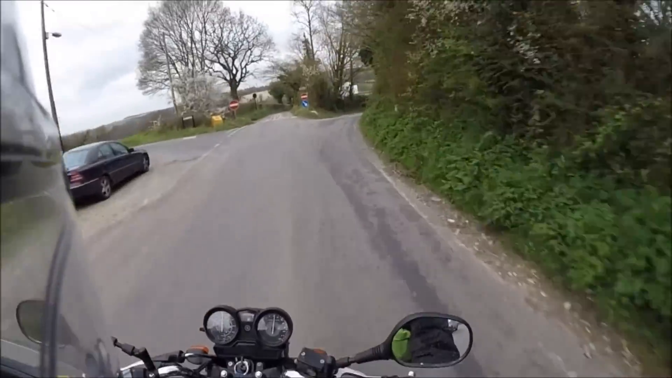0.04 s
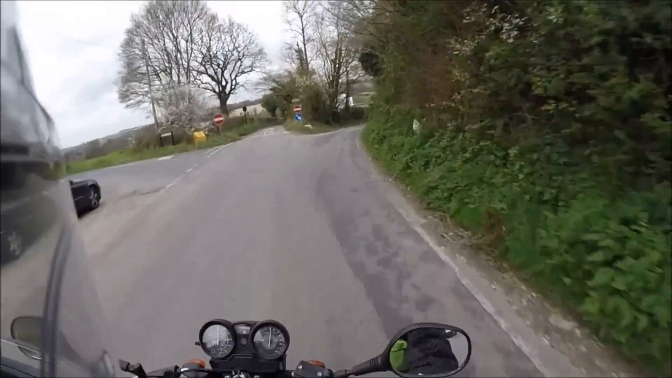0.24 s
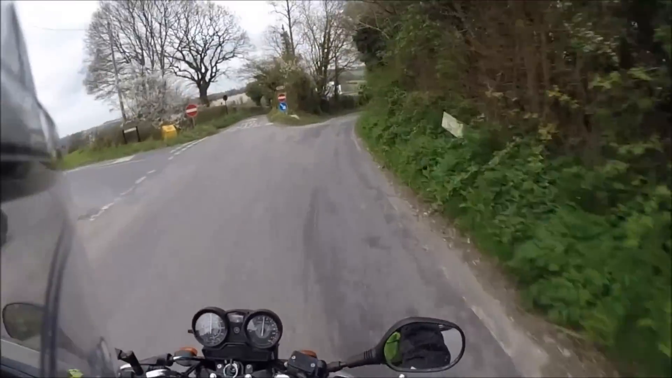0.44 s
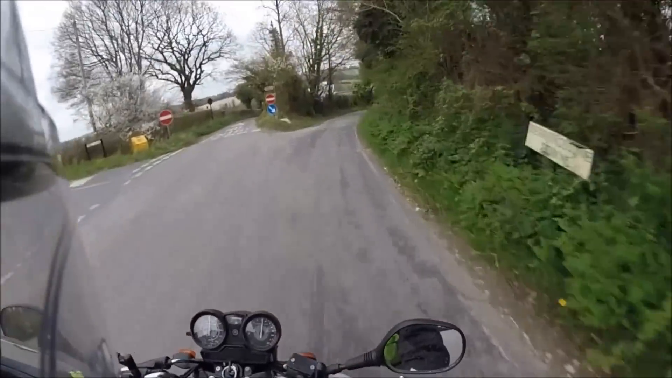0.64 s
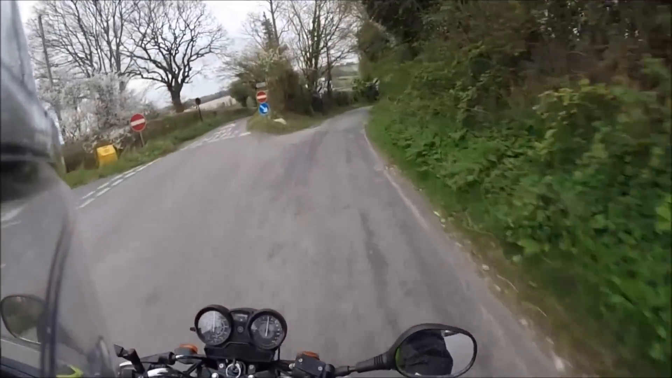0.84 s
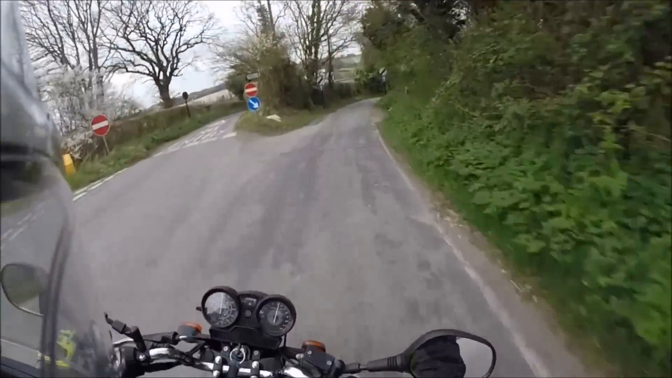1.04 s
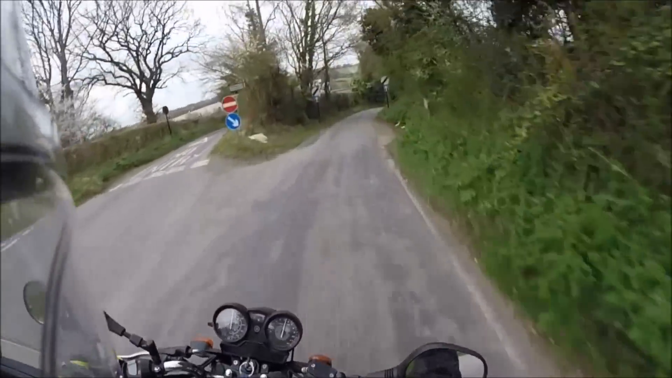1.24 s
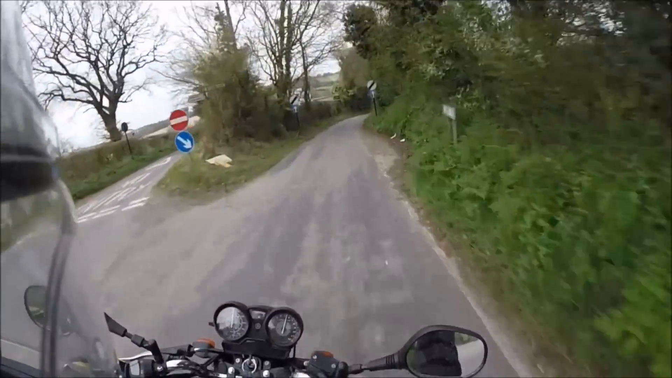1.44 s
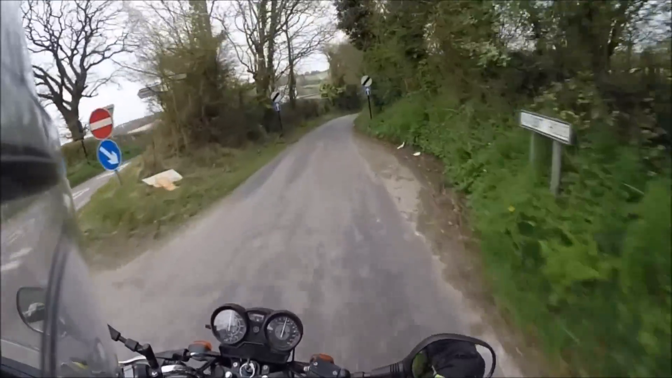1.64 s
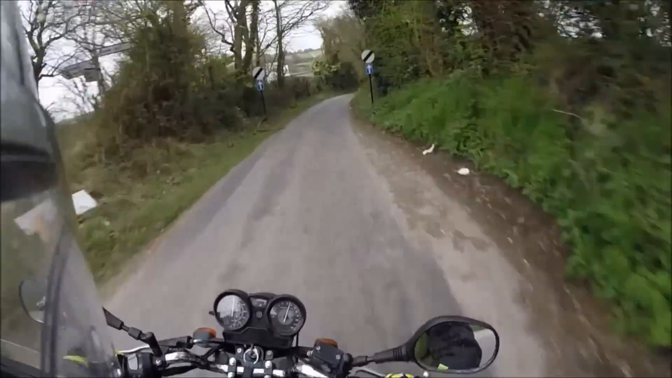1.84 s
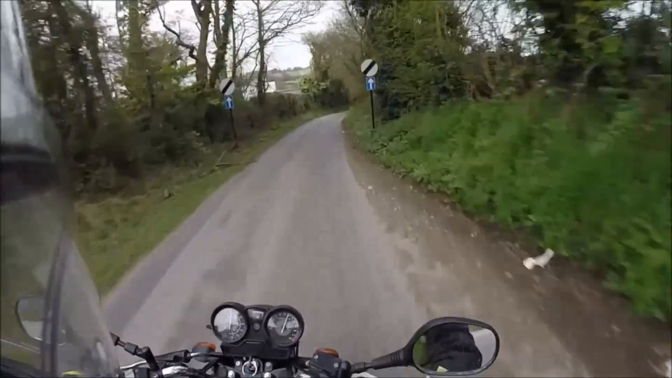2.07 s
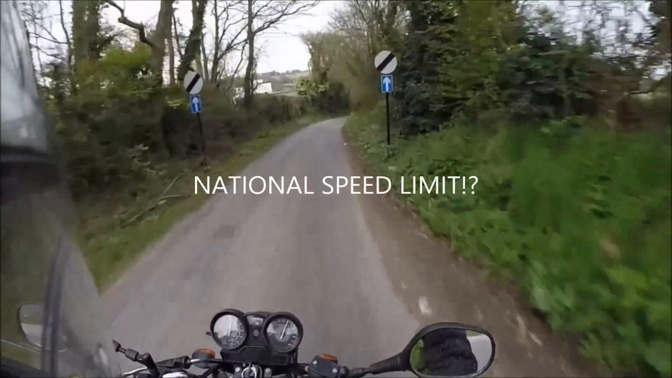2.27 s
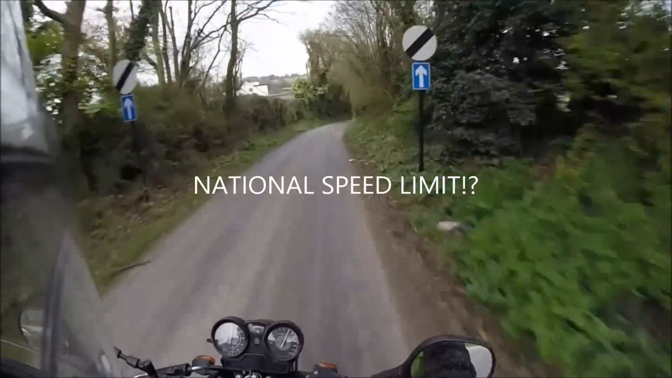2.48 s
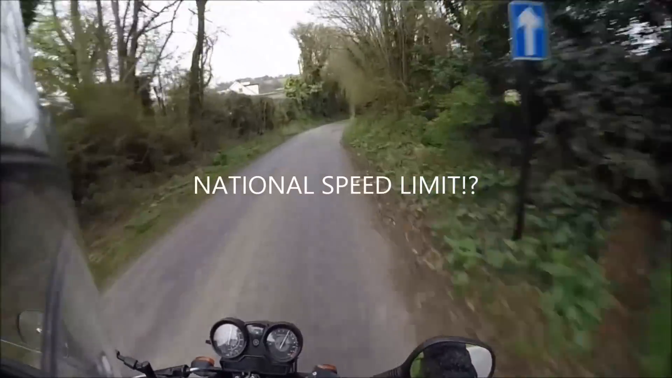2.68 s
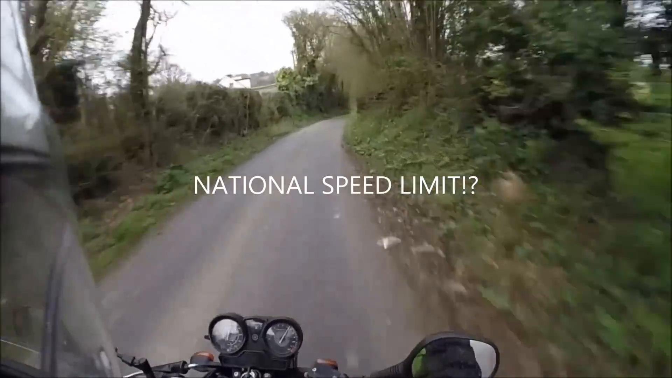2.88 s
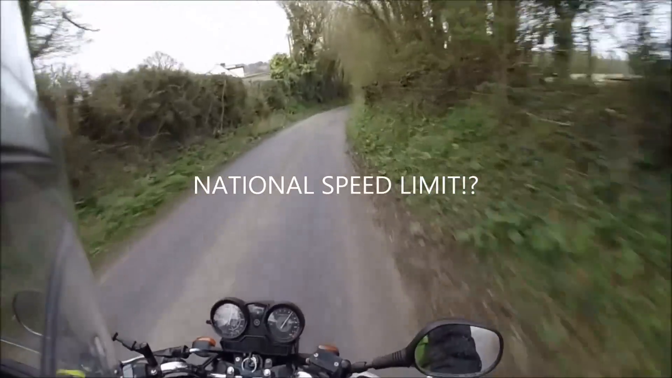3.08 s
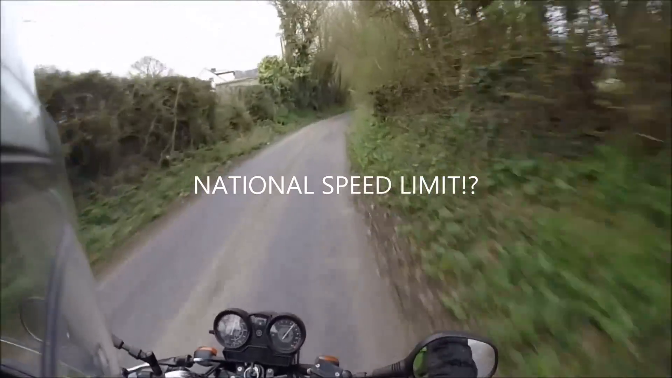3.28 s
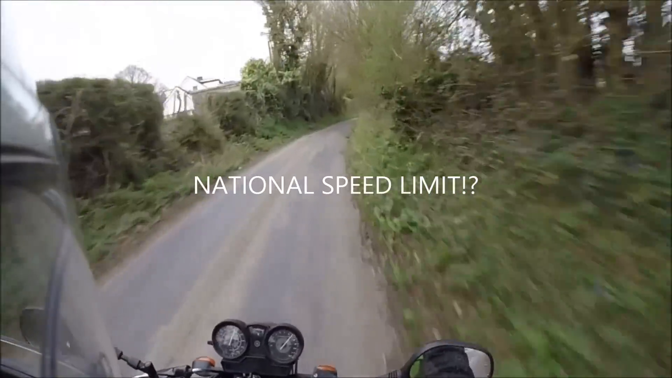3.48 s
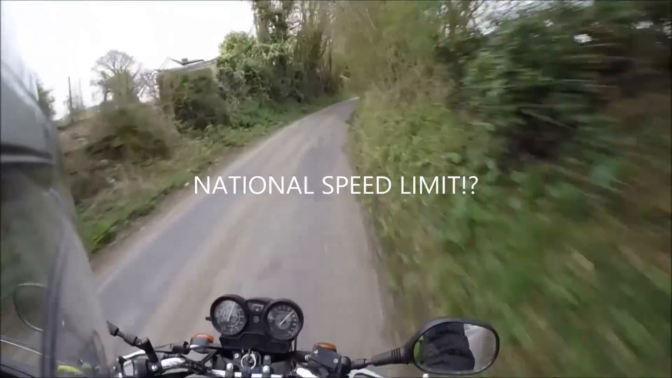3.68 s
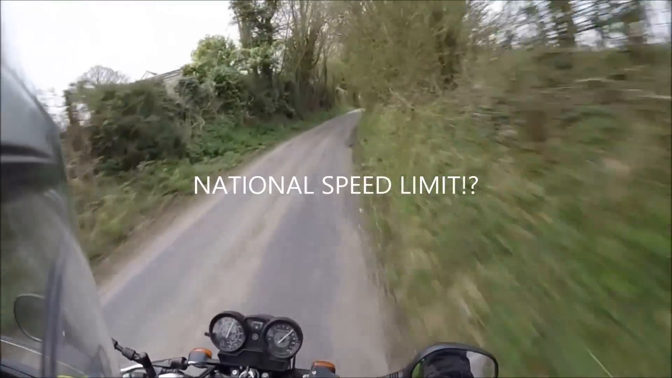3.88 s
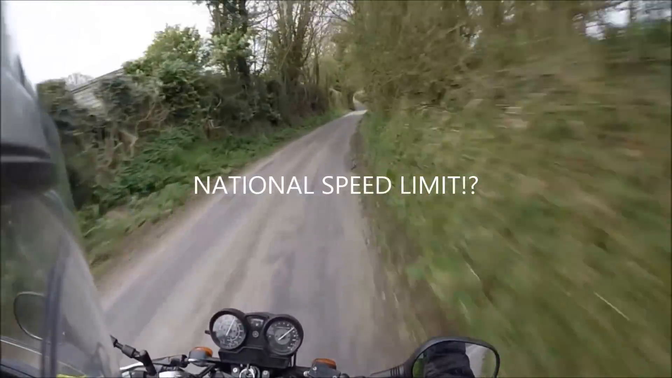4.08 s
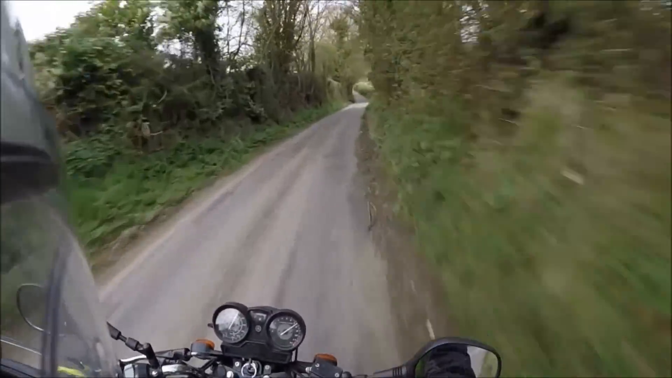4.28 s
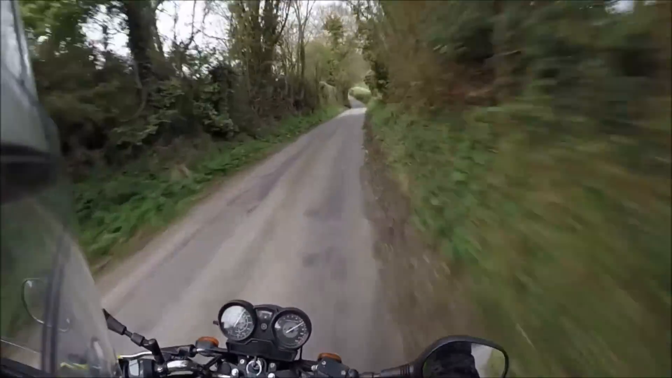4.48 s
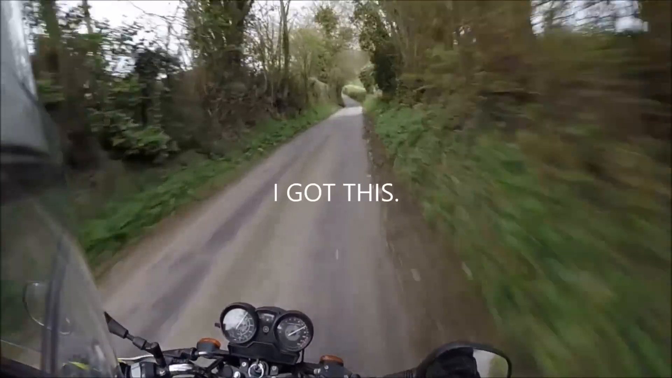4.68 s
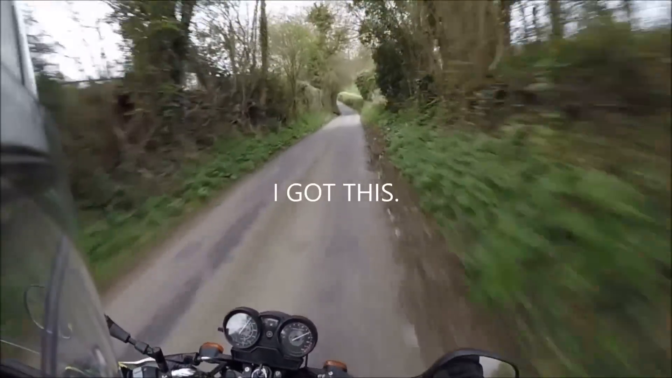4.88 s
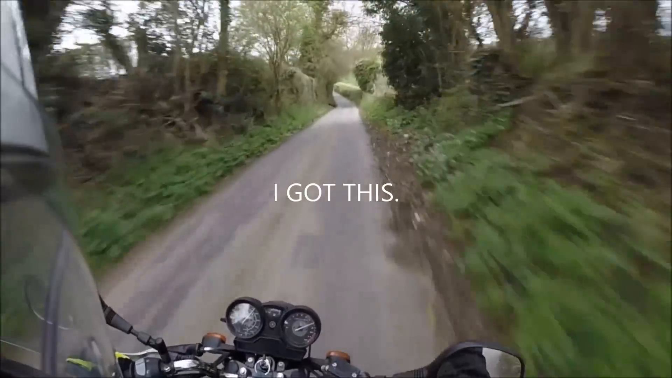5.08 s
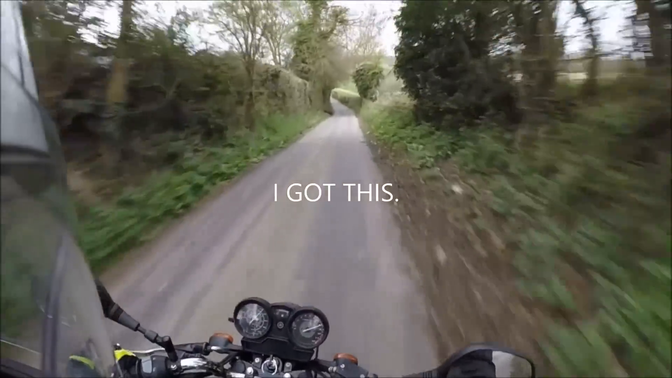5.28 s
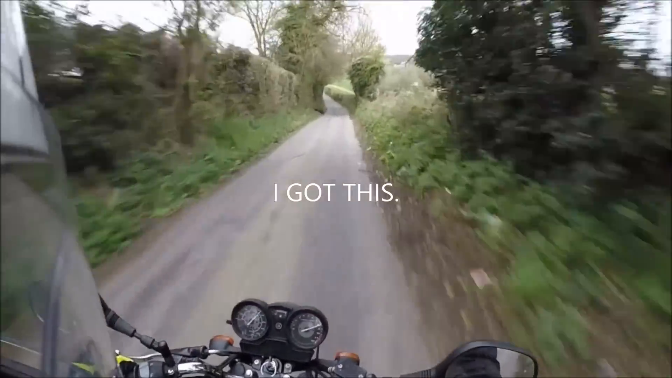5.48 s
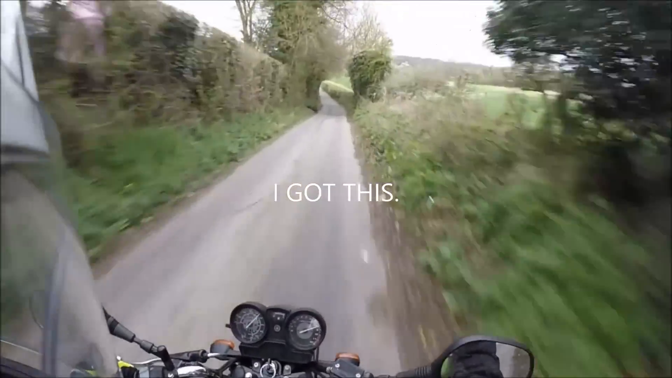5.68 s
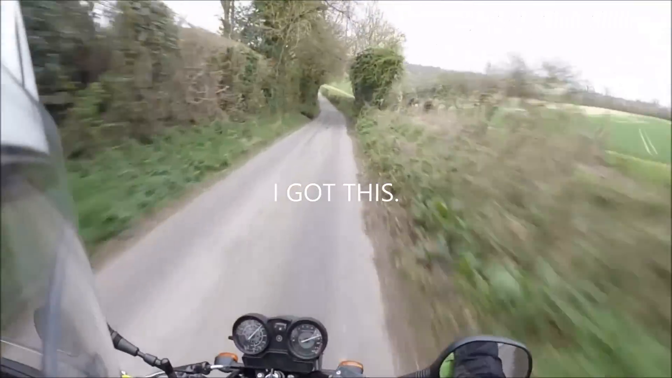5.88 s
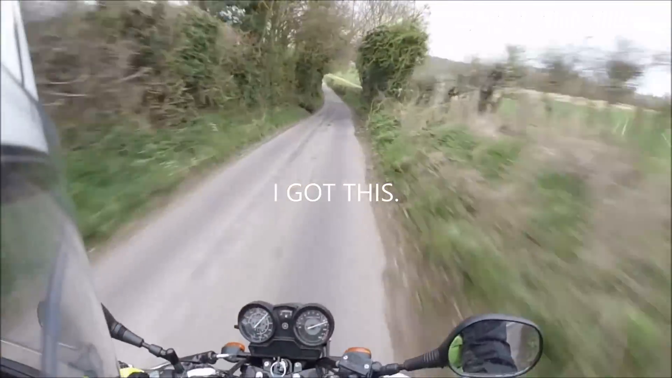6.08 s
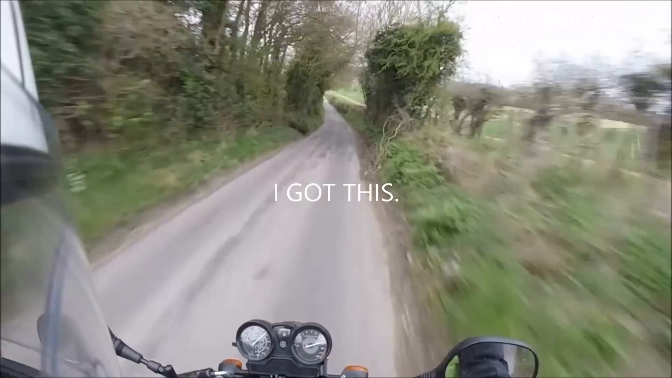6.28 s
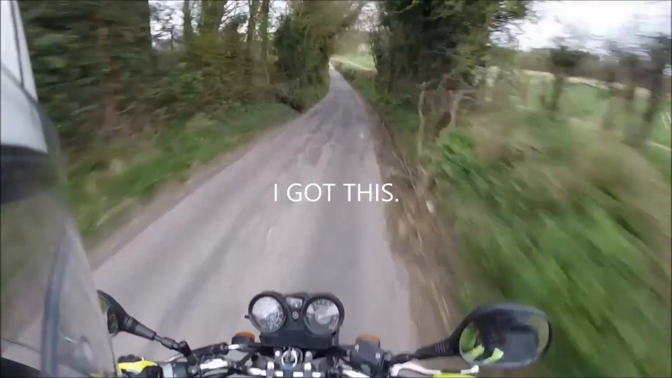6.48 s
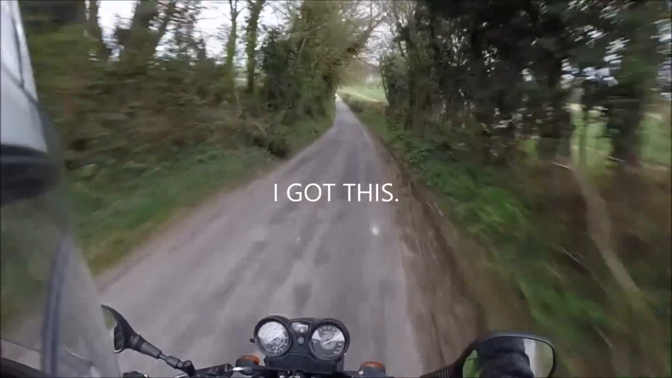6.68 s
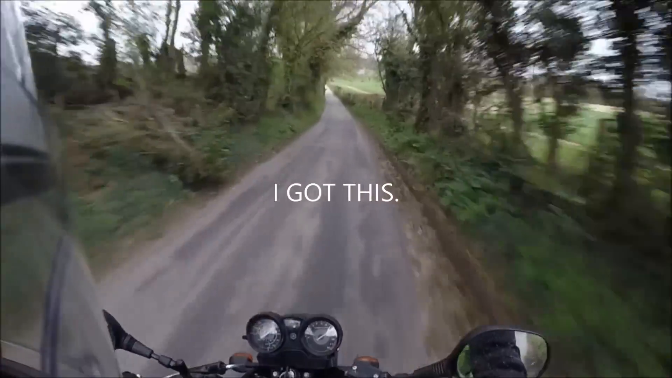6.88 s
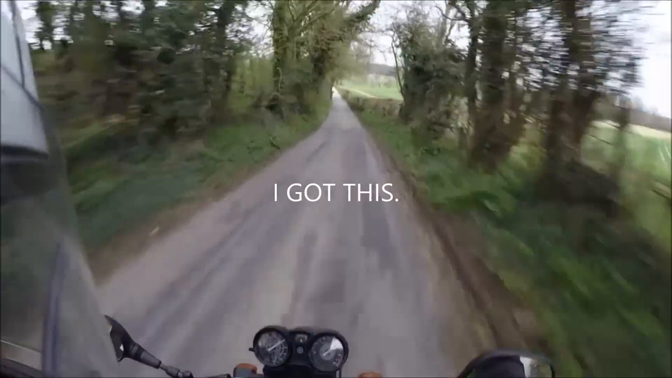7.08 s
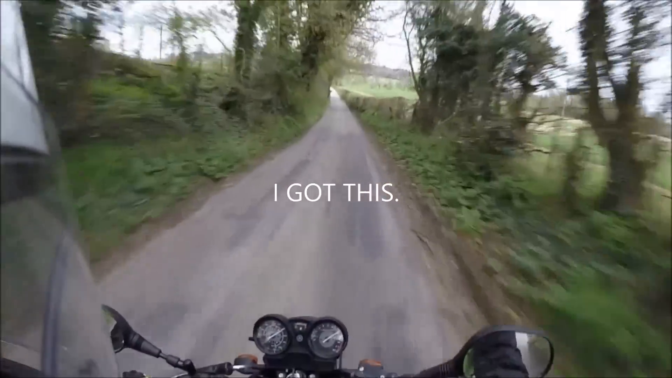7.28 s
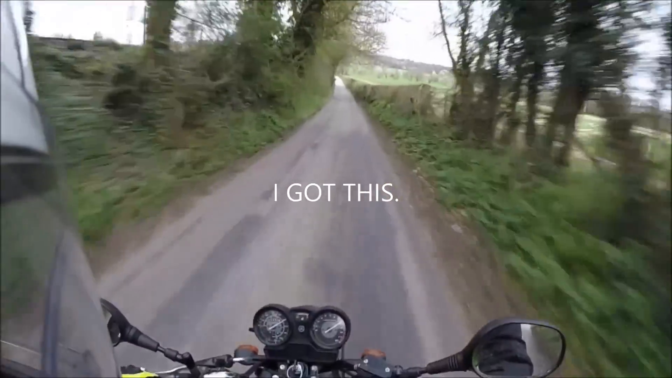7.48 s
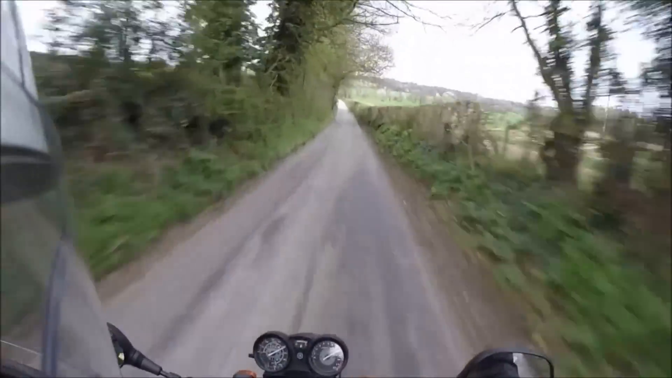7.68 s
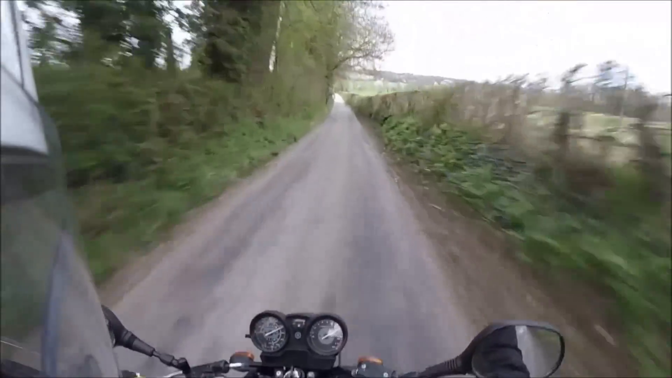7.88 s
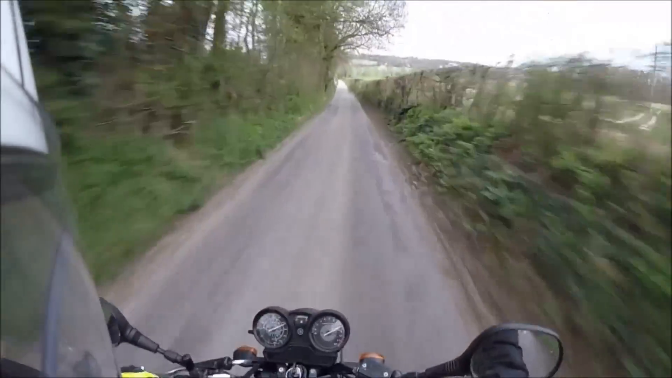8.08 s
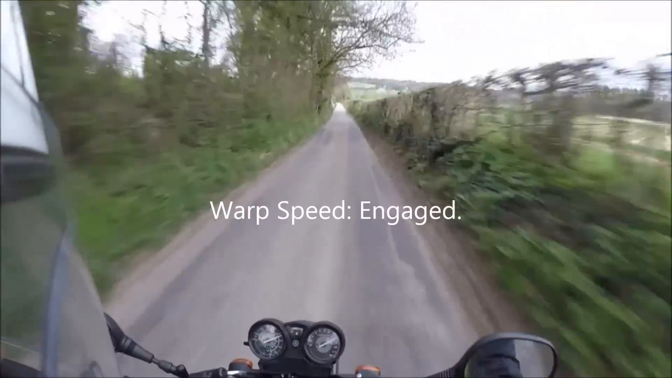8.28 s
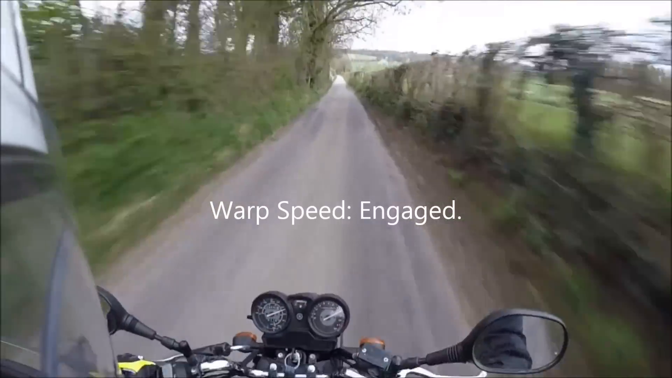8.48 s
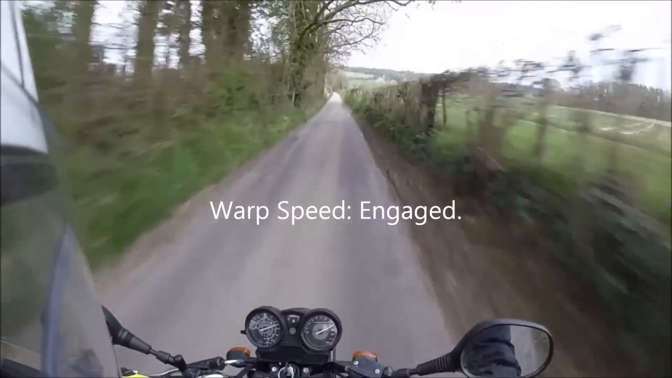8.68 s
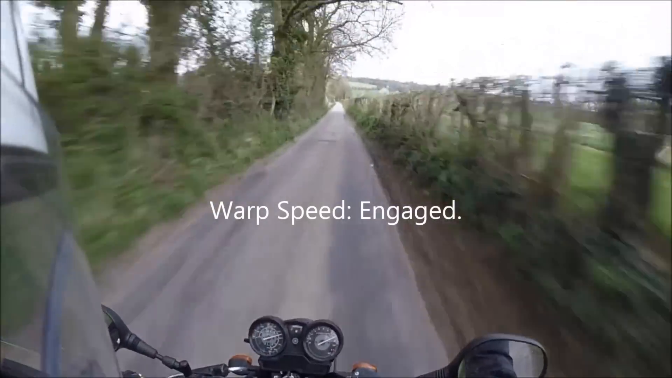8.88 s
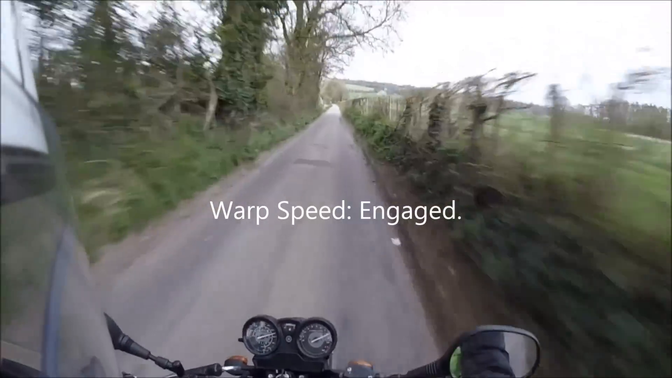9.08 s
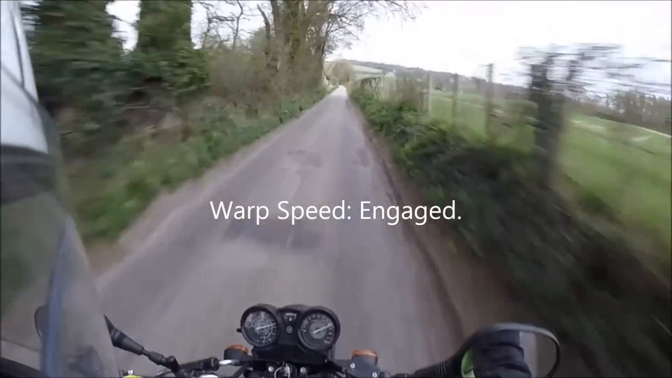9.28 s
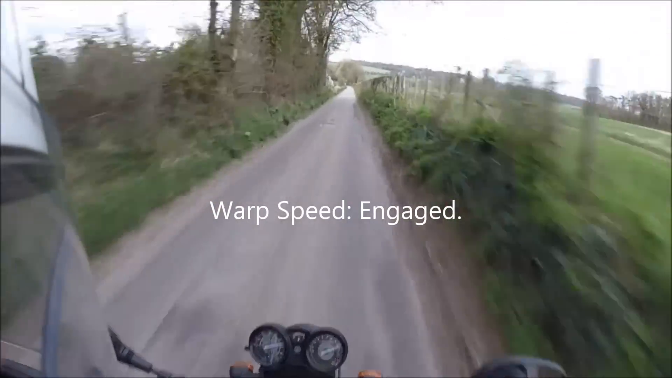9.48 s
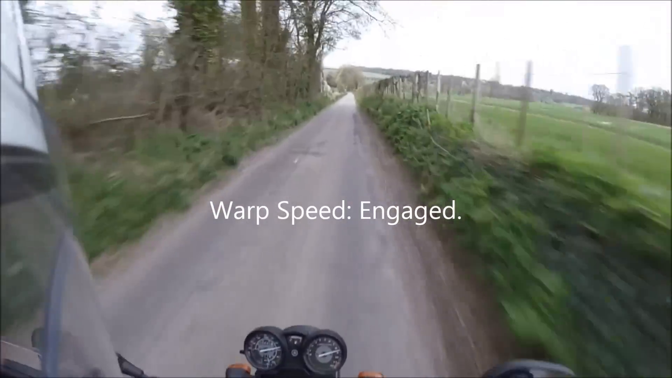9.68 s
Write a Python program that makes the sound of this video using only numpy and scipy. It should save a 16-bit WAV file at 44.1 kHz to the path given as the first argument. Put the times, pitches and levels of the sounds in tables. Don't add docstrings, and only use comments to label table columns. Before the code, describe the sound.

Wind fades in and rushes over an enclosed microphone on an accelerating motorcycle, brightening with speed, while a faint single-cylinder engine climbs underneath.

```python
import sys
import numpy as np
from scipy import signal
from scipy.fft import rfft, irfft, next_fast_len
from scipy.io import wavfile
from scipy.ndimage import uniform_filter1d

SR = 44100
rng = np.random.default_rng(int(sys.argv[2]) if len(sys.argv) > 2 else 0)


def level_to_linear(level):
    exponent = np.asarray(level, float) / 20
    return 10 ** exponent


def store_pcm(level_fs):
    pcm = np.round(np.clip(level_fs, -1, 1) * 32767).astype(np.int16)
    wavfile.write(sys.argv[1], SR, np.atleast_2d(pcm).T)


N = 429534

# time in seconds, rush in dB.
RUSH = [(0.0, -40.5), (0.05, -42.5), (0.43, -31.5), (0.84, -29.5), (1.0, -24.5), (1.16, -27.5),
        (1.54, -23.5), (1.98, -24), (2.3, -20.5), (5.07, -20.5), (5.24, -21.5), (6.78, -20.5),
        (7.24, -21.5), (7.35, -19.5), (8.24, -21), (8.71, -19), (9.0, -20.5), (9.74, -20.5)]
# frequency in Hz, density in dB per Hz.
HOUSING_COLOUR = [(30, -8), (250, -15.5), (420, -20), (800, -21), (1250, -16), (1500, -3), (2100, -4.5),
                  (3550, -7.5), (3950, -18), (4120, -25.5), (7300, -31.5), (8200, -41), (14000, -51),
                  (15500, -59)]
# centre in Hz, width in Hz, height in dB.
CAVITIES = [(75.4, 38, -1.5), (176, 86, 8.5), (331, 82, 6.5), (610, 58, 3.5), (1784, 290, 8),
            (2092, 130, -8), (2400, 200, 2.5), (2425, 80, -8), (2675, 206, 4.5), (3540, 150, 1),
            (4350, 96, 4.5), (4780, 830, -3.5), (5466, 460, 10), (6470, 270, -4), (6600, 180, 0),
            (6650, 140, 3.5), (10480, 1700, 6.5), (11100, 500, -6.5), (11600, 500, 0.5), (12100, 300, -1),
            (12600, 550, 0), (13500, 600, 2), (13950, 500, -5)]
# time in seconds, rise in dB.
HISS_SWELLS = [
    (2.6, 2.5),
    (3.52, 3),
    (4.7, 2.5),
    (6.86, 5),
    (7.2, 6.5),
    (7.84, 5.5),
    (8.32, 2.5),
    (9.12, 3),
]
HISS_SWELL_S = 0.077
HISS_AT_CRUISE_DB, HISS_DB_PER_OCTAVE = -1, 10
RUMBLE_DB, RUMBLE_LAG_S = -2, 0.49

# time in seconds, peak in dB, length in seconds.
JOLTS = [(.25, -54.5, .35), (0.564, -40.5, 0.11), (0.996, -40, 0.15), (1.33, -44, .08), (1.512, -38, .07),
         (1.806, -40, .1), (2.05, -40, 0.13), (2.3, -44, 0.19), (2.784, -32, 0.074), (3.14, -49, 0.074),
         (3.42, -46, .16), (3.723, -37, .12), (3.918, -43, 0.12), (4.14, -37, 0.076), (4.48, -41, 0.15),
         (4.75, -41.5, 0.13), (4.95, -39, 0.074), (5.135, -37, 0.055), (5.287, -37, 0.053),
         (5.97, -33, 0.14), (6.38, -39, .1), (6.8, -49, 0.28), (7.18, -36.5, 0.19), (7.53, -42, 0.18),
         (7.829, -40.5, 0.15), (8.27, -42, 0.13), (8.636, -40, .1), (8.868, -29, 0.057), (9.102, -30, 0.11),
         (9.7, -41, 0.12)]
MOUNT_HZ, MOUNT_WIDTH_HZ = 50, 10
MOUNT_REST_DB = -25.5

# time in seconds, firings per second.
FIRING_RATE = [(0, 41), (1, 44), (1.5, 45.5), (2, 47.8), (3, 54), (4, 60), (5, 65.4), (6, 69.4), (7, 74.3),
               (8, 78.8), (9, 83.4), (9.74, 85)]
CRUISE_FIRINGS = 60
# time in seconds, level in dB.
ENGINE_LEVEL = [(0, -84), (.8, -66), (1.1, -55), (1.6, -52), (2.2, -48), (3, -47), (3.4, -44), (4.5, -43),
                (5, -47), (6, -49), (7, -50), (8, -49), (9, -49), (9.74, -52)]
# frequency in Hz, gain in dB.
EXHAUST = [(40, -14), (84, 3), (92, -1), (102, -4), (114, -22), (180, -6), (265, -18), (300, -8), (330, 0),
           (372, 1), (392, -8), (420, -20), (525, -9), (620, -22)]

# time in seconds, pitch in Hz, level in dB.
WHISTLE = [
    (3.49, 7170, -110),
    (3.52, 6680, -48.5),
    (3.59, 6650, -50.5),
    (3.62, 6650, -110),
]

# time in seconds, threshold in dB re the frame's rms.
STARVED = [(1.131, -1), (1.173, -2), (2.453, -11.5), (2.731, -3), (3.541, 0), (3.584, -5.5), (4.267, 0),
           (4.821, -7.5), (5.077, -4.5), (5.248, 5), (5.483, 2), (5.653, -1.5), (6.187, 5.5), (6.251, -6),
           (6.549, -4), (6.677, -8), (7.189, -1.5), (7.275, -7), (7.637, -1), (7.872, -5), (8.043, -7.5),
           (8.107, 1), (8.256, -6), (8.384, -1.5), (8.533, -3), (9.408, -3.5), (9.6, -6.5), (9.664, -9)]
# time in seconds, first threshold in dB, second threshold in dB.
STARVED_TWICE = [(4.949, 1, 1), (6.315, -2, -3), (6.912, -2, -4), (7.467, -3, -2), (9.344, -5, -2)]
# time in seconds, threshold in dB.
STARVED_SHORT = [(4.907, -5), (4.928, 5), (6.293, -2)]
# frequency in Hz, threshold shift in dB.
FAVOURED = [(330, -14), (480, -4), (700, 3.5), (1100, 4), (1300, -14), (3850, -14), (4050, 2), (5000, 0),
            (7000, -2), (9000, 0)]
FRAME_S = 1024 / 48000


def rms_one(x):
    return x / np.sqrt(np.mean(x ** 2) + 1e-20)


def in_time(rows):
    s, *columns = np.transpose(rows)
    return [np.interp(np.arange(N) / SR, s, column) for column in columns]


def at_hz(points, hz):
    point_hz, point_db = np.transpose(points)
    return np.interp(np.log(hz), np.log(point_hz), point_db)


def drift(rate):
    r = np.exp(-80 * np.pi * rate / SR)
    noise = rng.standard_normal(N // 40 + 2002)
    slow = signal.lfilter([1], [1, -2 * r, r * r], noise)[2000:]
    return np.interp(np.arange(N) / 40, np.arange(len(slow)), rms_one(slow))


def swells(s, height, length_s):
    t = np.arange(0, N + 64, 64) / SR
    bells = height * np.exp(-.5 * (2 * (t[:, None] - s) / length_s) ** 2)
    return np.interp(np.arange(N) / SR, t, bells.sum(axis=1))


def wind_controls():
    rush_db, = in_time(RUSH)
    speed_octaves = np.log2(in_time(FIRING_RATE)[0] / CRUISE_FIRINGS)
    swell_s, swell_db = np.transpose(HISS_SWELLS)
    hiss_db = HISS_AT_CRUISE_DB + HISS_DB_PER_OCTAVE * speed_octaves
    hiss_db = hiss_db + swells(swell_s, swell_db, 2 * HISS_SWELL_S)
    mean_db = uniform_filter1d(rush_db, int(RUMBLE_LAG_S * SR), mode="nearest")
    return rush_db, hiss_db, mean_db - rush_db + RUMBLE_DB


def wind(gust_db=0.67, flutter_db=0.53):
    rush_db, hiss_db, rumble_db = wind_controls()
    size = next_fast_len(N)
    hz = np.maximum(np.arange(size // 2 + 1) * SR / size, 1)
    colour_db = at_hz(HOUSING_COLOUR, hz)
    for centre_hz, width_hz, db in CAVITIES:
        colour_db = colour_db + db / (1 + (2 * (hz - centre_hz) / width_hz) ** 2)
    turbulence = rfft(rng.standard_normal(size)) * level_to_linear(colour_db)
    air = rfft(rms_one(irfft(turbulence, size)))
    half_octave = np.clip(2 * np.log2(hz / 30), 0, 18)
    gust, out = drift(40), 0
    for k in range(19):
        share = np.clip(1 - abs(half_octave - k), 0, 1)
        band = irfft(air * share, size)[:N]
        centre = 30 * 2 ** (k / 2)
        high = np.clip(np.log2(centre / 3800) / 1.7, 0, 1) ** 0.76
        low = np.clip(np.log2(1400 / centre) / 1.2, 0, 1)
        level_db = rush_db + high * hiss_db + low * rumble_db
        lumps_db = gust_db * (1 - low) * gust + flutter_db * drift(12)
        out = out + band * level_to_linear(level_db + lumps_db)
    return out


def mount(evened=0.6, trim_db=-1.5):
    r, w = np.exp(-np.pi * MOUNT_WIDTH_HZ / SR), 2 * np.pi * MOUNT_HZ / SR
    resonance = [1, -r * np.exp(1j * w)]
    swing = signal.lfilter([1], resonance, rng.standard_normal(N + SR))[SR:]
    swing = signal.lfilter([1], resonance, swing)
    swing = swing / (abs(swing) + 1e-9) ** evened
    jolt_s, peak_db, length_s = np.transpose(JOLTS)
    shake = level_to_linear(in_time(RUSH)[0] + MOUNT_REST_DB) + swells(jolt_s, level_to_linear(peak_db), length_s)
    return level_to_linear(trim_db) * shake * rms_one(swing.real)


def engine(first_db=-14, crank_db=8, waver_db=1.5, wobble=.002):
    firings = uniform_filter1d(in_time(FIRING_RATE)[0], size=SR // 2)
    firings = firings * (1 + wobble * drift(4.2))
    turn, out = 2 * np.pi * np.cumsum(firings) / SR, 0
    for order in range(1, 15):
        own_db = first_db * (order == 1) + crank_db * (order == 2)
        line_db = at_hz(EXHAUST, order * firings) + own_db + waver_db * drift(2.5)
        out = out + level_to_linear(line_db) * np.sin(order * turn + rng.uniform(0, 2 * np.pi))
    return np.sqrt(2) * level_to_linear(in_time(ENGINE_LEVEL)[0]) * out


def whistle(waver=.004):
    hz, level_db = in_time(WHISTLE)
    phase = 2 * np.pi * np.cumsum(hz * (1 + waver * drift(60))) / SR
    return np.sqrt(2) * level_to_linear(level_db) * np.sin(phase)


def scene():
    return (wind() + mount() + engine() + whistle())[None]


def starve(x, starved, frame_s, scatter_db=2.5):
    hop = round(frame_s * SR)
    n, k = np.arange(2 * hop), np.arange(hop)
    window = np.sin(np.pi * (n + .5) / (2 * hop))
    cosines = np.cos(np.pi / hop * np.outer(k + .5, n + .5 + hop / 2))
    basis = cosines * window * np.sqrt(2 / hop)
    favour_db = at_hz(FAVOURED, (k + .5) * SR / (2 * hop))
    frames = [round(s / frame_s) for s, db in starved]
    chance = rng.standard_normal((len(starved), 64))
    out, start = x.copy(), 0
    for i, frame in enumerate(frames):
        follows = i > 0 and frame == frames[i - 1] + 1
        start = start + hop if follows else round((frame - 1) * frame_s * SR)
        lines = basis @ x[start:start + 2 * hop]
        threshold_db = starved[i][1] + favour_db + scatter_db * chance[i, k // 16]
        step = 2 * lines.std() * level_to_linear(threshold_db)
        rounded = np.round(lines / step) * step
        out[start:start + 2 * hop] += (rounded - lines) @ basis
    return out


def roll_off(x):
    return signal.sosfilt(signal.butter(12, 15250, fs=SR, output="sos"), x)


def record(dry):
    band_limit = signal.ellip(10, .3, 60, 15120, fs=SR, output="sos")
    limited = signal.sosfilt(band_limit, dry[0])
    pairs = [(s + k * FRAME_S, db) for s, *both in STARVED_TWICE for k, db in enumerate(both)]
    mix = starve(limited, sorted(STARVED + pairs), FRAME_S)
    mix = starve(mix, STARVED_SHORT, FRAME_S / 2)
    return roll_off(mix[None])


dry = scene()
out = record(dry)
store_pcm(out)
```